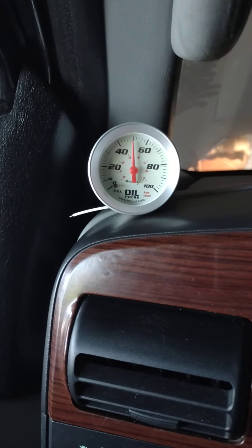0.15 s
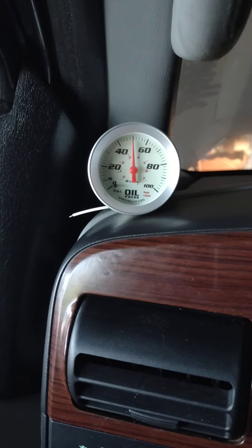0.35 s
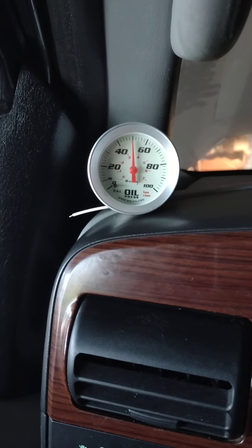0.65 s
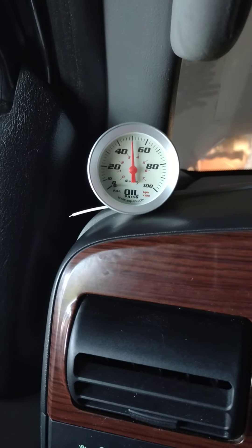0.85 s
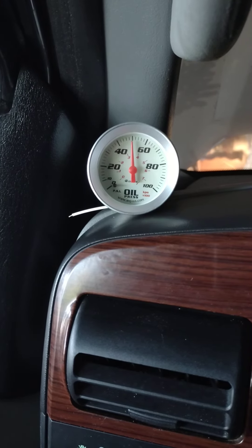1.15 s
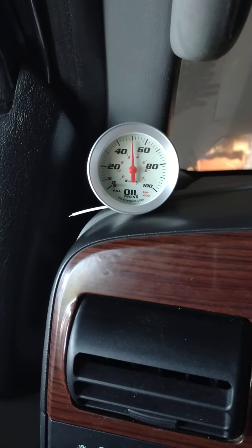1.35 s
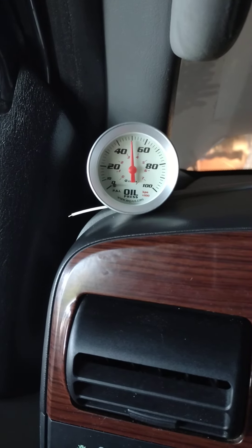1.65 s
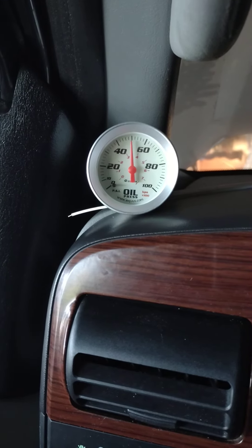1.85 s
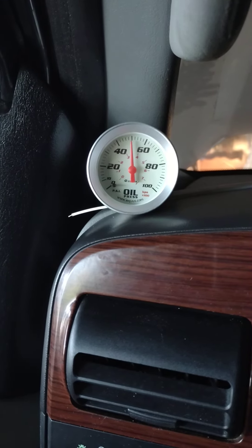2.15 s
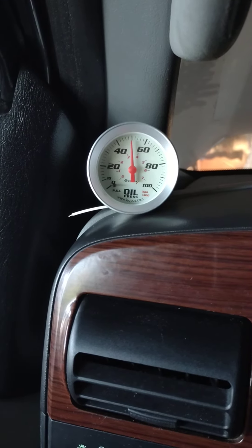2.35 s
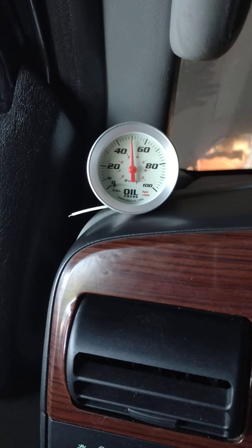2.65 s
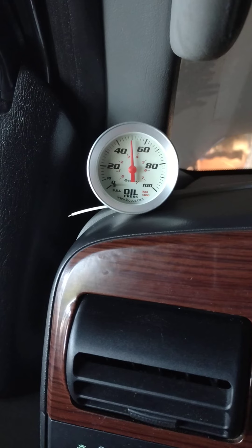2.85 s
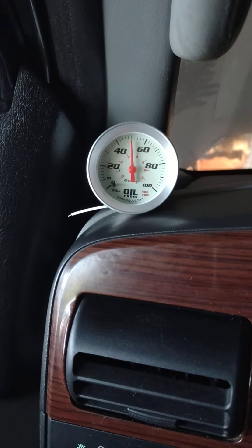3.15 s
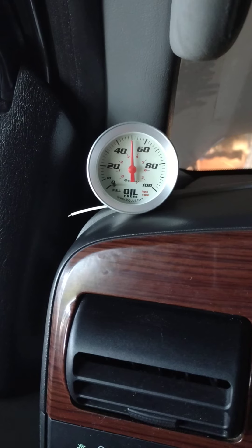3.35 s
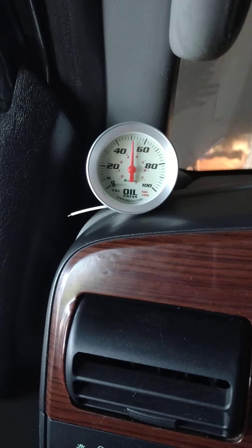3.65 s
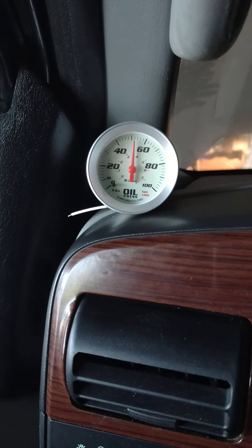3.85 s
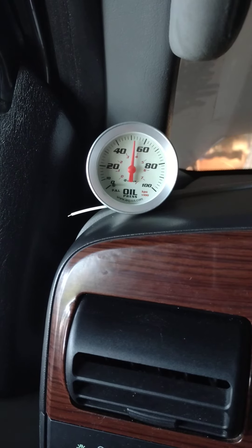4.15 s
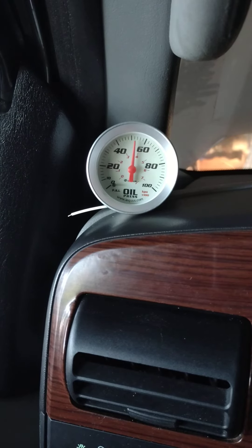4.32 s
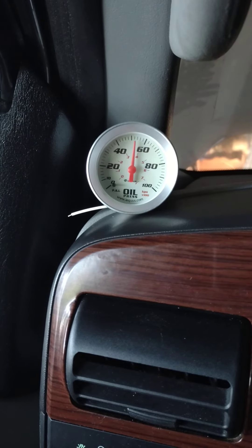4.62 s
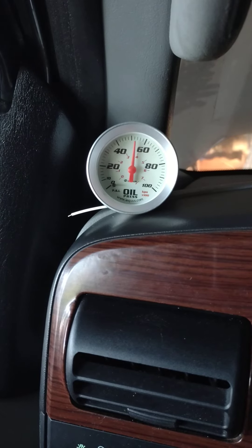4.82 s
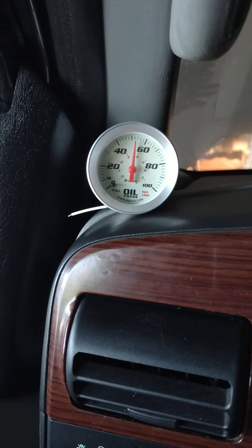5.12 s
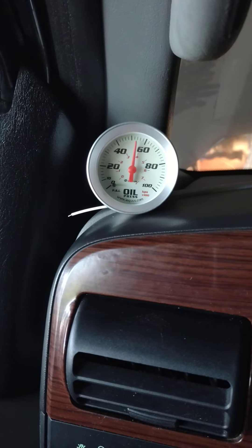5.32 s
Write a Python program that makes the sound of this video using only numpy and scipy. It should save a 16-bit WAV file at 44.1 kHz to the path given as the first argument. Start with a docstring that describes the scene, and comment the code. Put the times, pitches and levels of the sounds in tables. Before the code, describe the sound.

A V8 truck engine, heard from inside the cab, idles with a low throb, then revs twice after a couple of plastic clicks.

```python
"""A V8 truck engine, heard inside the closed cab, idles and is then revved twice.
Its firing orders boom in the cab; unequal cylinder puffs ring the exhaust pipe and shake the panels.
Valve gear and intake rustle through the firewall and the throttle hisses, over steady fan air.
Before the revs a plastic control in the cab clicks, then clicks back with a soft thump."""
import sys
import numpy as np
from scipy import signal
from scipy.fft import rfft, irfft, next_fast_len
from scipy.io import wavfile
from scipy.ndimage import map_coordinates

SR = 44100
rng = np.random.default_rng(int(sys.argv[2]) if len(sys.argv) > 2 else 0)


def pcm_store(signal):
    """Save signal as 16-bit PCM."""
    levels = np.round(np.clip(np.atleast_2d(signal), -1, 1) * 32767)
    wavfile.write(sys.argv[1], SR, levels.astype(np.int16).T)


N = 241602
TIME_S = np.arange(N) / SR


def amp(db):
    """dB to gain."""
    return 10 ** (np.asarray(db) / 20)


def unit(x):
    """Scale to rms 1."""
    return x / np.sqrt(np.mean(x ** 2) + 1e-20)


def db_at(spectrum, hz):
    """Read (f/Hz, level/dB) points on a log frequency axis."""
    f, db = np.transpose(spectrum)
    return np.interp(np.log(hz + 1), np.log(f + 1), db)


def wobble(knots_per_s):
    """Smooth random curve."""
    knots = rng.standard_normal(int(N * knots_per_s / SR) + 4)
    return map_coordinates(knots, [TIME_S * knots_per_s])


def swell(start_s, end_s, attack_s=0.071, release_s=0.099):
    """Ramp to 1 from start_s, hold, ramp to 0 from end_s."""
    return np.clip((TIME_S - start_s) / attack_s, 0, 1) * np.clip(1 - (TIME_S - end_s) / release_s, 0, 1)


def filtered(x, response):
    """Apply a complex frequency response."""
    size = next_fast_len(len(x) + SR // 2)
    return irfft(rfft(x, size) * response(np.fft.rfftfreq(size, 1 / SR)), size)[:len(x)]


def ringing(x, spectrum):
    """Minimum-phase filter: each spectral peak rings on after a push."""
    cepstrum = irfft(np.log(amp(db_at(spectrum, np.fft.rfftfreq(2 * SR, 1 / SR)))))
    cepstrum[1:SR] *= 2
    cepstrum[SR:] = 0
    impulse_response = irfft(np.exp(rfft(cepstrum)))[:SR]
    return signal.fftconvolve(x, impulse_response)[:len(x)]


def resonances(modes, hz):
    """Response of (f/Hz, width/Hz, level/dB) modes of alternating sign."""
    return sum((-1) ** k * amp(db) * 1j * hz * width / (centre ** 2 - hz ** 2 + 1j * hz * width)
               for k, (centre, width, db) in enumerate(modes))


def noise(spectrum):
    """Coloured noise, rms 1."""
    return unit(filtered(rng.standard_normal(N), lambda hz: amp(db_at(spectrum, hz))))


def pulses(at, sizes):
    """Impulses at fractional sample positions."""
    at = np.clip(at, 0, N - 2)
    whole = at.astype(int)
    fraction = at - whole
    return np.bincount(whole, sizes * (1 - fraction), N) + np.bincount(whole + 1, sizes * fraction, N)


def loudness(law, firing_hz, pedal):
    """Gain from a law: (idle/dB, dB per doubling of speed, dB added at full throttle)."""
    idle_db, doubling_db, throttle_db = law
    return amp(idle_db + doubling_db * np.log2(firing_hz / firing_hz[0]) + throttle_db * pedal)


# Fan air spectrum: f/Hz, relative level/dB
FAN_SPECTRUM = [(150, -27), (350, -5), (480, -1), (560, -4.5), (820, -6.5), (1000, -12.0), (1500, -11.5),
                (2000, -15.5), (2900, -19), (3400, -31), (5000, -34), (7500, -36.5), (8400, -58.5)]


def fan_air(level_db=-61.5):
    """Steady rush of air from the fan."""
    return amp(level_db) * noise(FAN_SPECTRUM)


# Plastic crack spectrum: f/Hz, relative level/dB
CRACK_SPECTRUM = [(200, -9.5), (400, -14.5), (620, -7.5), (1100, -9.5), (1450, -6), (2000, -3.5),
                  (2500, -5.5), (3300, -16), (4200, -19.5), (5500, -24), (7600, -21), (8800, -50)]
# Modes of control and trim: f/Hz, relative level/dB, t60/s
TRIM_MODES = [(540, -9, 0.062), (781, -3, .11), (975, -12, 0.08), (1300, -9, 0.07), (1595, -6, 0.088),
              (1700, -0.5, 0.049), (1890, 2, 0.046), (2346, -11.5, .07), (2380, -7.5, 0.054),
              (3520, -15.5, 0.055)]
# Contacts: t/s, crack level/dB, treble corner/Hz, ring gain/dB, thump level/dB
CONTACTS = [(2.2255, -41, 8160, -40, -69), (2.2298, -29, 9090, -42, -50), (2.2372, -34, 8870, -39.5, -57),
            (2.654, -43.5, 3900, -43, -27)]


def control_clicks(crack_t60_s=0.099, thump_hz=124, thump_t60_s=0.17, rise_s=0.00065):
    """Each contact cracks, scatters round the padded cab, rings the trim and thumps the panel."""
    out = np.zeros(N + SR)
    t = np.arange(SR // 3) / SR
    for start_s, crack_db, corner_hz, ring_db, thump_db in CONTACTS:
        colour = lambda hz: amp(db_at(CRACK_SPECTRUM, hz)) / np.sqrt(1 + (hz / corner_hz) ** 4)
        crack = unit(filtered(rng.standard_normal(len(t)), colour)) * amp(crack_db - 60 * t / crack_t60_s)
        ring = sum(amp(ring_db + db - 60 * t / t60_s) * np.sin(2 * np.pi * (hz * t + rng.random()))
                   for hz, db, t60_s in TRIM_MODES)
        thump = np.sin(2 * np.pi * thump_hz * t) * amp(thump_db - 60 * t / thump_t60_s)
        out[round(start_s * SR):][:len(t)] += (crack + ring) * (1 - np.exp(-t / rise_s)) + thump
    return out[:N]


# Open and shut throttle bands, each filter applied twice: f/Hz, width/Hz, level/dB
OPEN_BANDS = [(4640, 300, -1.5), (5300, 690, -2.5), (7100, 460, -2.5)]
SHUT_BANDS = [(4770, 360, 0.5), (6640, 500, 0)]


def throttle(firing_hz, pedal, rush_law=(-112, 10, 18), shut_s=(4.52, 5.0), shut_db=-81):
    """Air rushes through the open throttle and hisses past the shut plate between the revs."""
    hiss = lambda bands: unit(filtered(rng.standard_normal(N), lambda hz: resonances(bands, hz) ** 2))
    rush = loudness(rush_law, firing_hz, pedal) * hiss(OPEN_BANDS)
    return rush + amp(shut_db) * swell(*shut_s, attack_s=0.18, release_s=0.1) * hiss(SHUT_BANDS)


# Intake duct modes: f/Hz, width/Hz, relative level/dB
DUCT_MODES = [(765, 40, -4.5), (810, 110, -12.5), (966, 130, -5.5), (1473, 59, -0.5), (1718, 47, 0.5),
              (1908, 79, -6), (2200, 52, -12.5), (2920, 180, -13)]


def intake(firings, gulp_db=3.5, firewall_hz=2700):
    """Air rings the intake duct, one gulp a cylinder; the firewall dulls it."""
    flow = rng.standard_normal(N) * amp(gulp_db * np.sin(2 * np.pi * firings))
    response = lambda hz: resonances(DUCT_MODES, hz) / np.sqrt(1 + (hz / firewall_hz) ** 10)
    return unit(filtered(flow, response))


# Valve gear spectrum: f/Hz, relative level/dB
VALVE_SPECTRUM = [(250, -25.5), (480, 0.5), (700, 1.5), (1020, -2), (1250, -4.5), (1750, -9.5), (2150, -8),
                  (2600, -7.5), (3300, -22.5), (4500, -28), (6000, -37.5), (7300, -38), (8400, -62.5)]


def valve_gear(firings, tick_db=1.5, flutter_db=0.63):
    """Valves and fan rustle, pulsing with each firing."""
    rustle = noise(VALVE_SPECTRUM)
    return unit(rustle * amp(tick_db * np.cos(2 * np.pi * firings) + flutter_db * wobble(60)))


# Pipe and belt lines: multiple of cycle rate (rounded in use), idle level/dB, loudest phase/cycles
HUM_LINES = [(11, -57, 0.7), (24, -53.5, .65), (40, -61.5, 0.6), (53, -67.5, 0.3), (54, -68, 0.5),
             (73.8, -71.5, 0.8), (83.5, -65.5, .29), (110.9, -75, .45), (127.6, -81, 0.6)]


def hums(cycles, revved, throb_db=4.0, waver_db=2, drift_rad=0.3, fade_db=-26):
    """Weak tones of pipe and belt drive throb once a cycle and fade with speed."""
    out = np.zeros(N)
    for order, db, peak_phase in HUM_LINES:
        throb = throb_db * np.cos(2 * np.pi * (cycles - peak_phase))
        gain = amp(db + throb + waver_db * wobble(7))
        phase = 2 * np.pi * (round(order) * cycles + rng.random()) + drift_rad * wobble(4.2)
        out += gain * np.sqrt(2) * np.sin(phase)
    return amp(fade_db * np.sqrt(revved)) * out


def lope(cycles, revved, order=37, peak_phase=0.03, db=-42.5, waver_db=0.86, drift_rad=0.61, fade_db=-30):
    """Uneven puffs make the pipe hoot once a cycle at idle; the hoot fades with speed."""
    hoot = np.cos(np.pi * (cycles - peak_phase)) ** 2
    tone = np.sqrt(2) * np.sin(2 * np.pi * order * cycles + drift_rad * wobble(5.7))
    return amp(db + waver_db * wobble(5.9) + fade_db * np.sqrt(revved)) * hoot * tone


# Cylinders in firing order: puff size/mean, delay/s
CYLINDER_PUFFS = [(1.14, 1e-05), (1.02, 0.00013), (1.01, 0.0), (1.166, 5e-05), (0.99, -6e-05),
                  (0.94, 6e-05), (1.11, 2e-05), (0.85, -0.0001)]


def puffs(firings, firing_hz, scatter):
    """Unequal cylinder puffs minus an even train: a pattern that repeats each cycle, plus scatter."""
    count = np.arange(1, int(firings[-1]))
    at = np.interp(count, firings, np.arange(N))
    size, delay_s = np.array(CYLINDER_PUFFS)[count % len(CYLINDER_PUFFS)].T
    size = size + scatter[at.astype(int)] * rng.standard_normal(len(at))
    return (pulses(at + delay_s * SR, size) - pulses(at, np.ones(len(at)))) / np.sqrt(firing_hz)


# Cab panel response: f/Hz, relative level/dB
PANEL_RESPONSE = [(100, -40.5), (230, -5), (285, 1.5), (320, -2.5), (355, -2), (410, -3.5), (490, -20.5),
                  (900, -43.5), (3000, -110)]


def panel_drone(firings, firing_hz, revved, turbulence=0.6):
    """Puffs and turbulent gas shake the cab panels."""
    push = unit(puffs(firings, firing_hz, scatter=0.03 + 0.05 * revved))
    return unit(ringing(push + turbulence * rng.standard_normal(N), PANEL_RESPONSE))


# Exhaust pipe response through the floor: f/Hz, relative level/dB
PIPE_RESPONSE = [(20, -55), (48, -5), (62, -14), (90, 1.5), (110, -8), (145, -1), (172, -4), (205, -6.5),
                 (240, -22), (300, -28.5), (600, -67.5), (2000, -120)]


def exhaust_burble(firings, firing_hz, revved):
    """Puffs ring the pipe, less regular with speed."""
    push = puffs(firings, firing_hz, scatter=0.033 + 0.07 * revved)
    return unit(ringing(push, PIPE_RESPONSE))


# Cab response: f/Hz, gain/dB
CAB_RESPONSE = [(30, -40), (44, -31.5), (55, -14), (68, -19.5), (78, -17), (83, -7.5), (88, -2), (97, 0),
                (106, -13), (119, -6.5), (134, -12), (154, -13), (180, -18.5), (195, -8.5), (210, 2),
                (226, -13.5), (258, -26), (284, -9), (330, -22)]
# Orders before cab gain: multiple of cycle rate, idle level/dB, speed doubling/dB, full throttle/dB
ENGINE_ORDERS = [(5, -46.5, 8.5, 11.5), (6, -50.5, 15.5, 3.5), (7, -42, 3, 10.5), (8, -28, -5.5, 21.5),
                 (16, -32.5, -4, 6)]


def engine_boom(cycles, firing_hz, pedal, waver_db=1.22, load_waver_db=1.56, stagger_cycles=0.0014):
    """Strong orders sweep through the cab resonances; under throttle the crank turns less evenly."""
    out = np.zeros(N)
    uneven_cycles = cycles + stagger_cycles * pedal * wobble(35)
    for order, *law in ENGINE_ORDERS:
        cab_db = db_at(CAB_RESPONSE, order * firing_hz / len(CYLINDER_PUFFS))
        flutter_db = (waver_db + load_waver_db * pedal) * wobble(25)
        tone = np.sqrt(2) * np.sin(2 * np.pi * (order * uneven_cycles + rng.random()))
        out += loudness(law, firing_hz, pedal) * amp(cab_db + flutter_db) * tone
    return out


# Engine speed: t/s, firing rate/Hz
ENGINE_SPEED = [(0, 44.1), (.4, 44.67), (.9, 44), (2.98, 43.85), (3.18, 51), (3.3, 77), (3.33, 85),
                (3.46, 96.5), (3.62, 127), (3.72, 135), (3.88, 133.5), (4.2, 109.5), (4.45, 93.5),
                (4.8, 75), (4.96, 74.5), (5.17, 97), (5.37, 142), (5.48, 154)]
# Accelerator blips: press t/s, lift t/s, depth (1 = full throttle)
PEDAL_BLIPS = [(3.09, 3.62, 0.97), (4.884, 5.5, 1.07)]
# Layer laws: idle level/dB, speed doubling/dB, full throttle/dB
EXHAUST_LAW, PANEL_LAW = (-48.5, 2.8, 12.3), (-61.5, 9.32, 6)
VALVE_LAW, DUCT_LAW = (-68, 11, 4), (-74.5, 15.4, -2.3)
STUMBLE_S, STUMBLE_DB = (3.04, 3.223), 5.5  # exhaust louder as the engine picks up
COAST_S, COAST_BOOM_DB, COAST_INTAKE_DB = (3.85, 4.55), 4.5, 3  # running down on a shut throttle


def scene():
    """Crank speed and pedal drive the engine layers, over fan air and the control's clicks."""
    firing_hz = np.interp(TIME_S, *np.transpose(ENGINE_SPEED))
    pedal = sum(depth * swell(press_s, lift_s, attack_s=0.31, release_s=0.3)
                for press_s, lift_s, depth in PEDAL_BLIPS)
    firings = np.cumsum(firing_hz) / SR
    cycles = firings / len(CYLINDER_PUFFS)
    revved = (firing_hz - firing_hz.min()) / np.ptp(firing_hz)
    stumble, coast = swell(*STUMBLE_S), swell(*COAST_S)
    gain = lambda law: loudness(law, firing_hz, pedal)
    boom = amp(COAST_BOOM_DB * coast) * engine_boom(cycles, firing_hz, pedal)
    idle_tones = hums(cycles, revved) + lope(cycles, revved)
    exhaust = gain(EXHAUST_LAW) * amp(STUMBLE_DB * stumble) * exhaust_burble(firings, firing_hz, revved)
    panels = gain(PANEL_LAW) * panel_drone(firings, firing_hz, revved)
    valves = gain(VALVE_LAW) * valve_gear(firings)
    duct = gain(DUCT_LAW) * amp(COAST_INTAKE_DB * coast) * intake(firings)
    engine = boom + idle_tones + exhaust + panels + valves + duct + throttle(firing_hz, pedal)
    return (engine + fan_air() + control_clicks())[None]


TOP_HZ = 8100


def record(dry):
    """Brick-wall low-pass at TOP_HZ."""
    return filtered(dry[0], lambda hz: hz < TOP_HZ)[None]


dry = scene()
out = record(dry)
pcm_store(out)
```